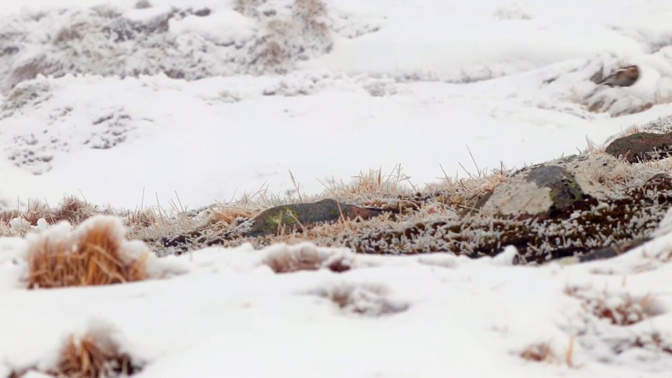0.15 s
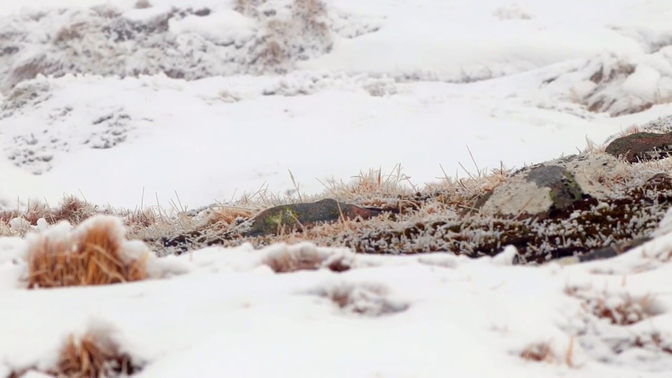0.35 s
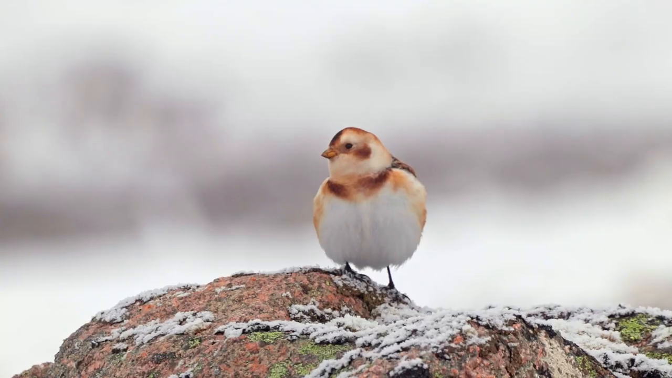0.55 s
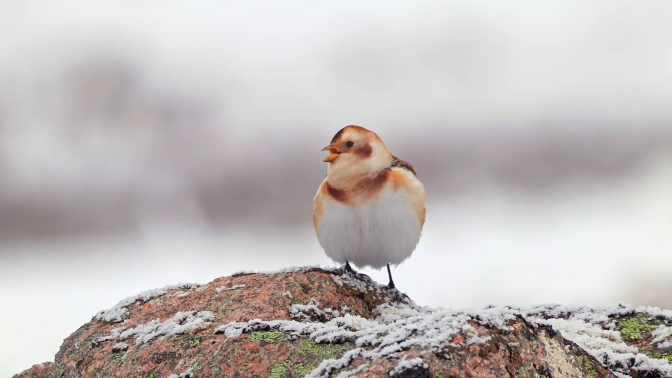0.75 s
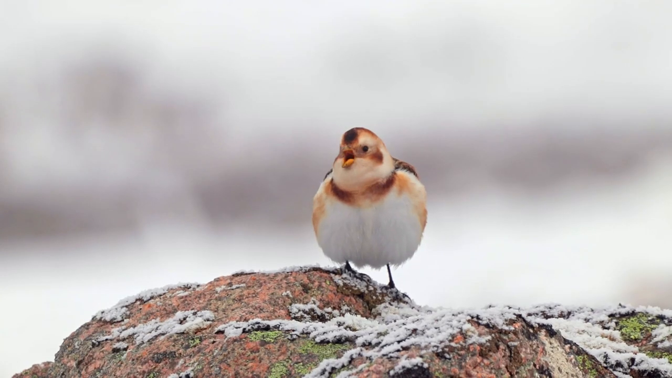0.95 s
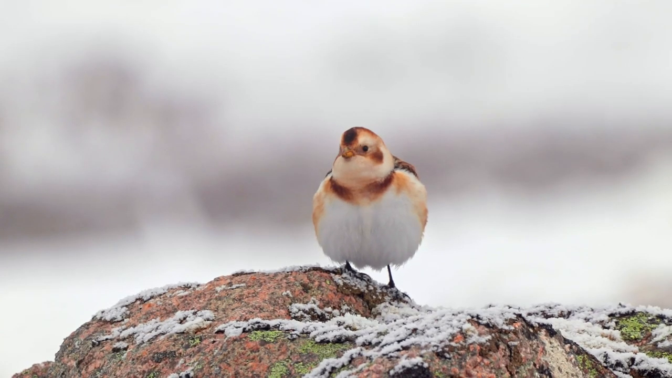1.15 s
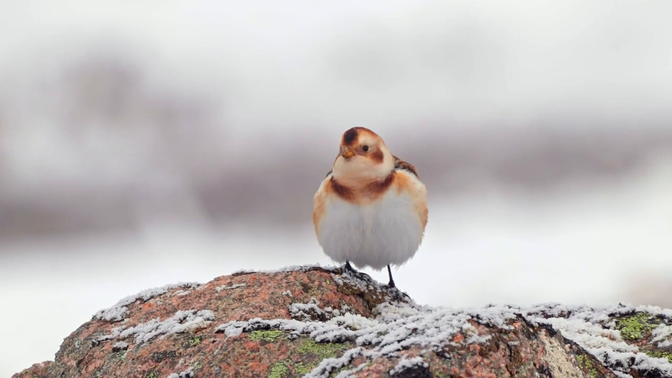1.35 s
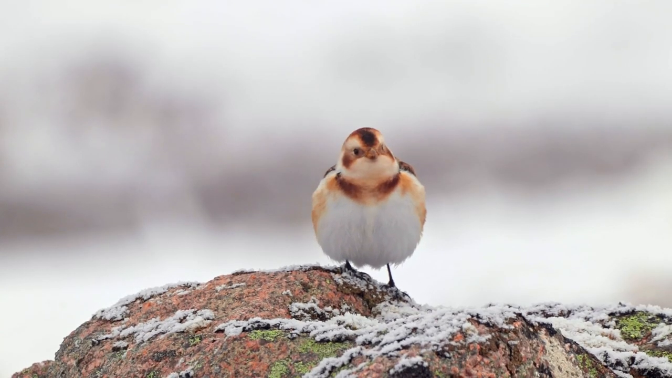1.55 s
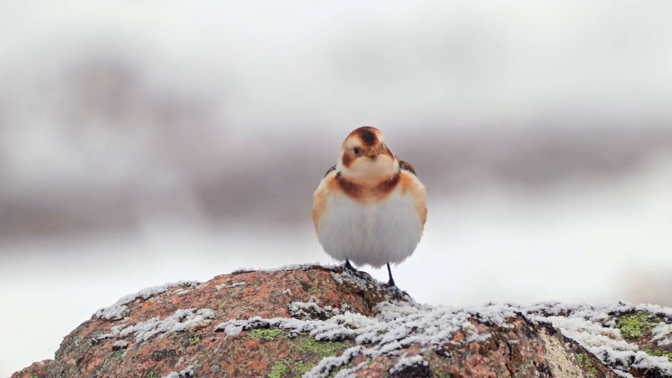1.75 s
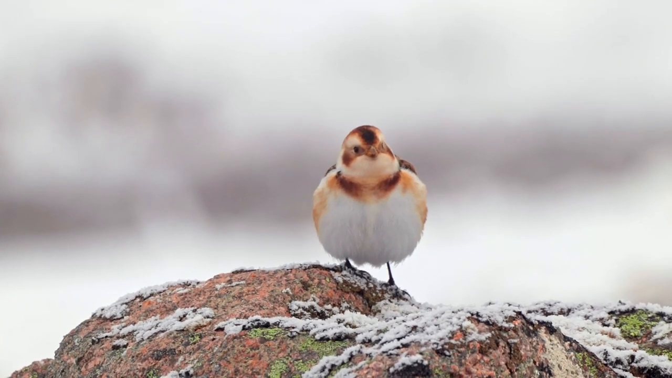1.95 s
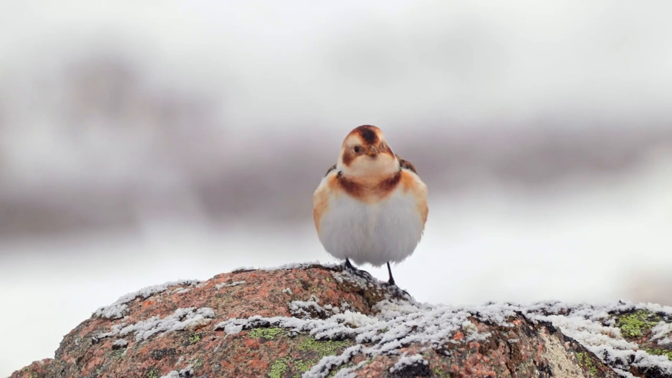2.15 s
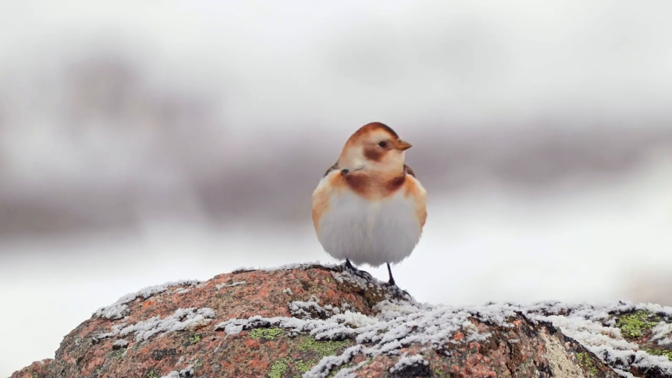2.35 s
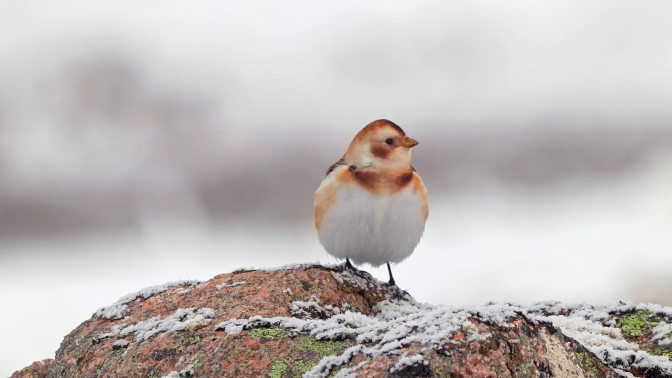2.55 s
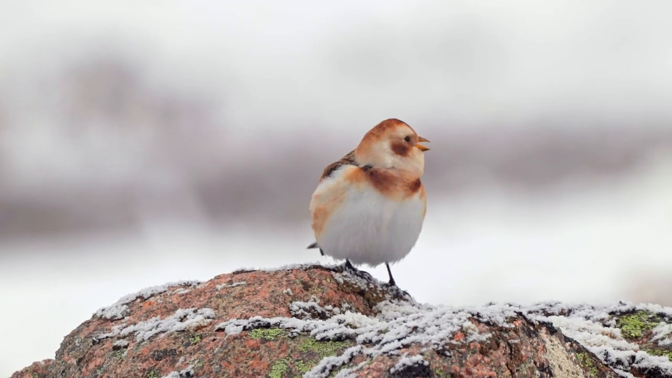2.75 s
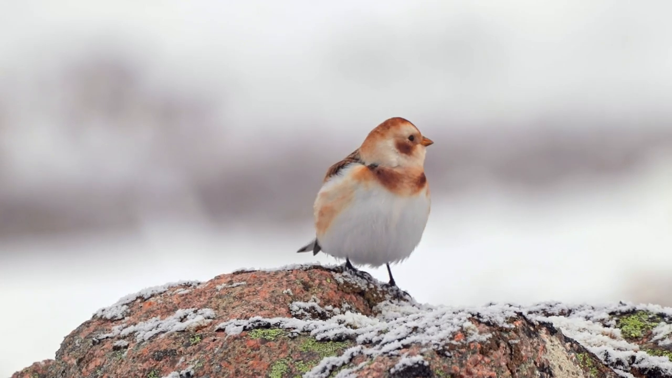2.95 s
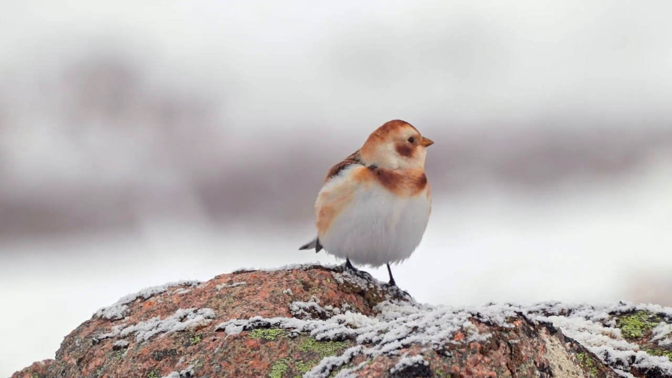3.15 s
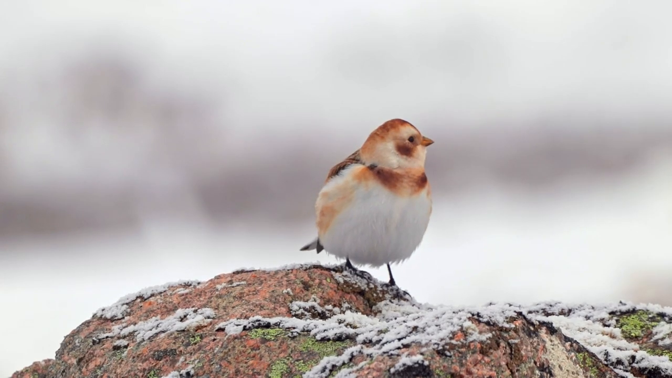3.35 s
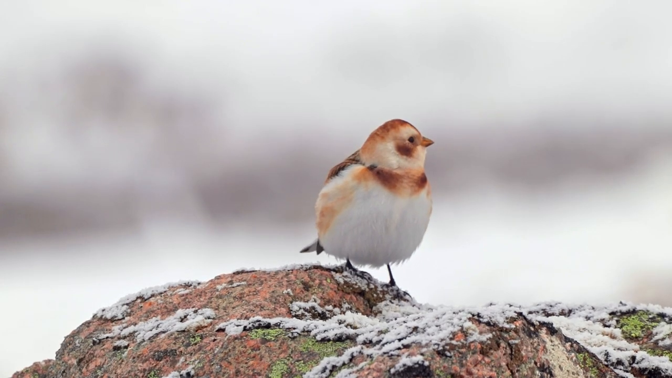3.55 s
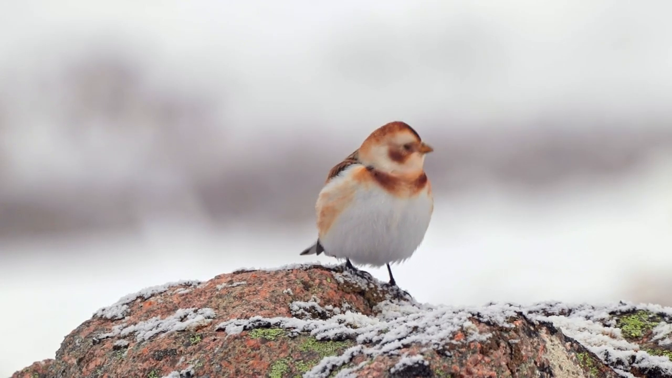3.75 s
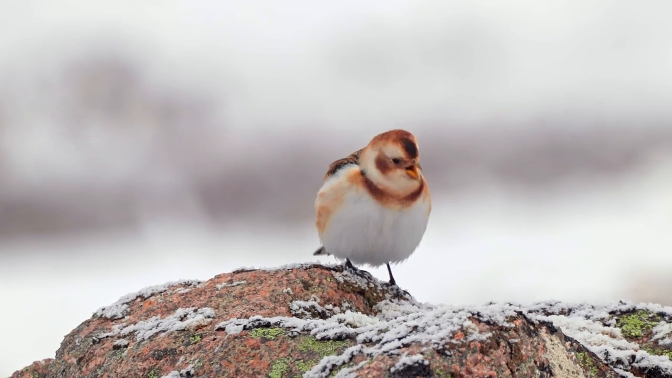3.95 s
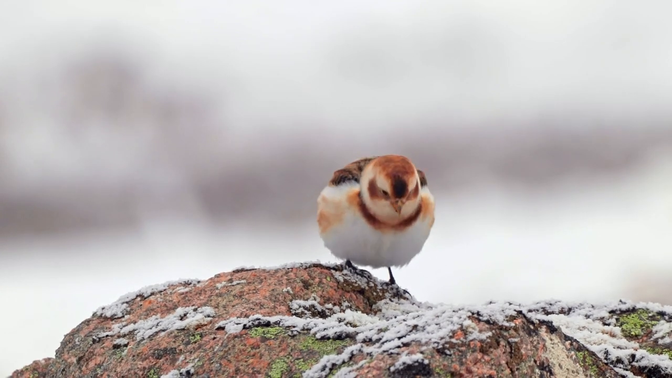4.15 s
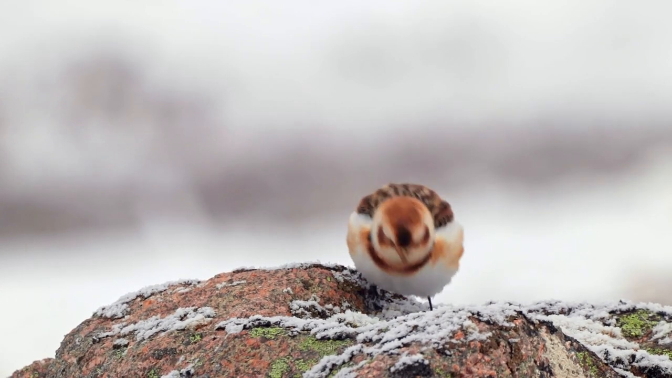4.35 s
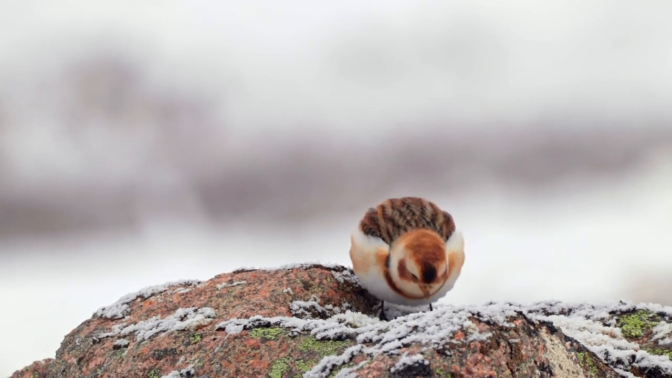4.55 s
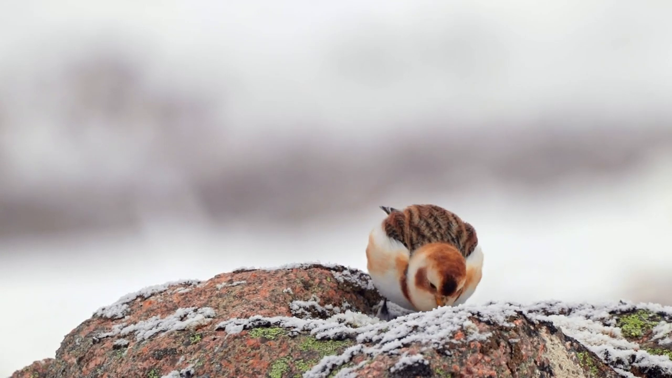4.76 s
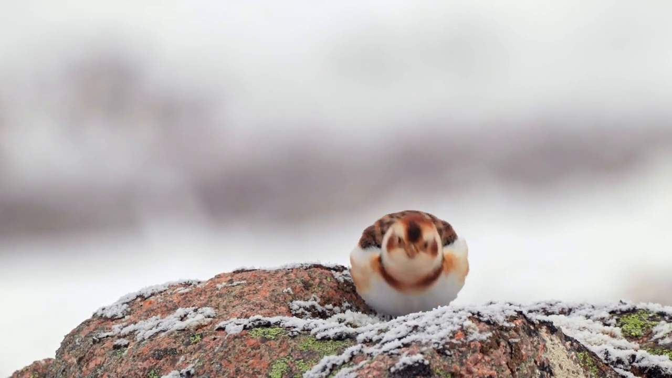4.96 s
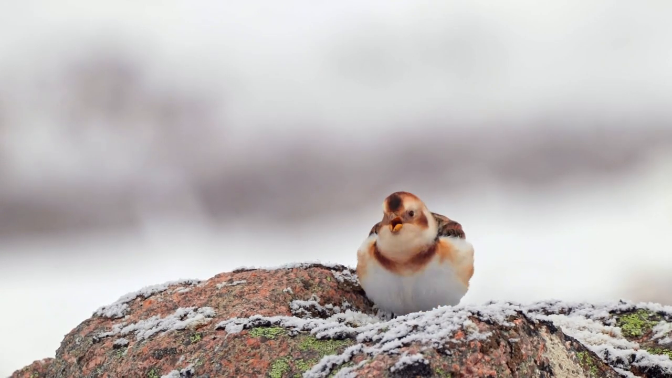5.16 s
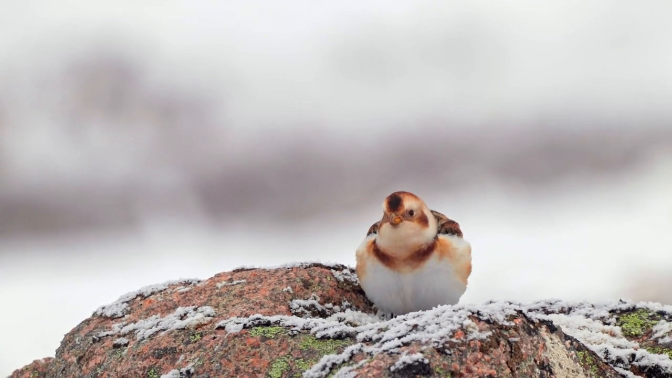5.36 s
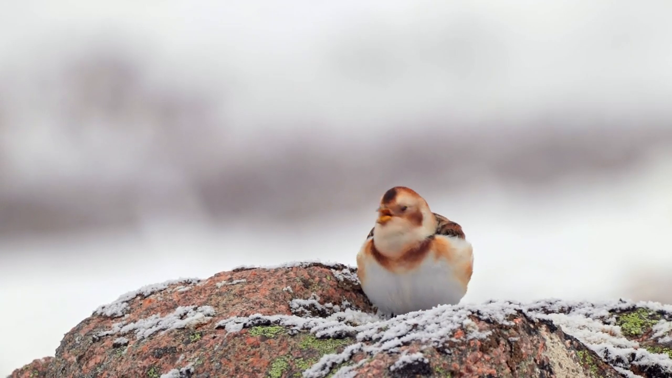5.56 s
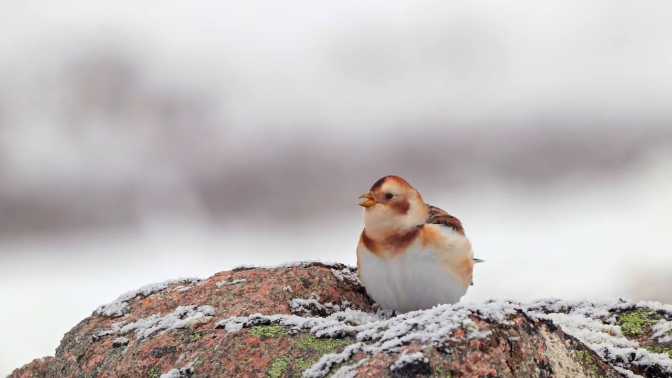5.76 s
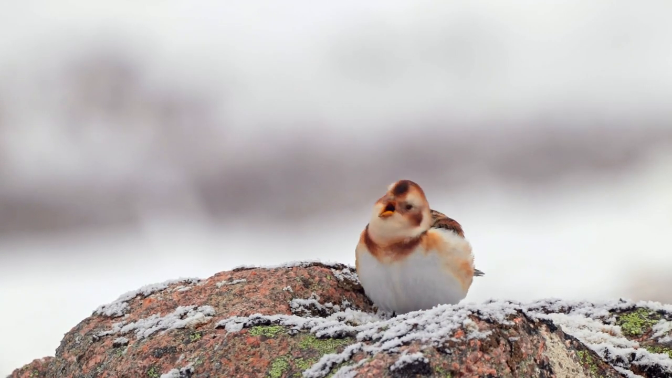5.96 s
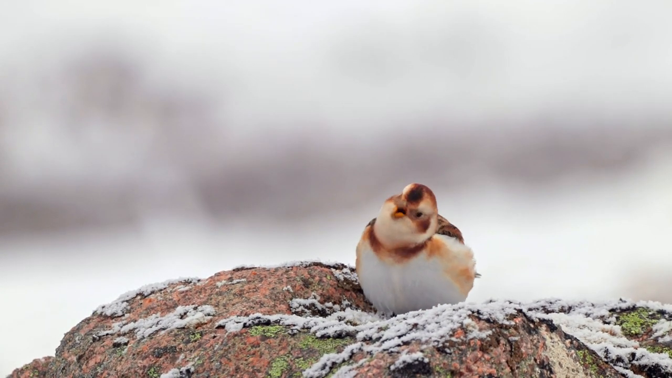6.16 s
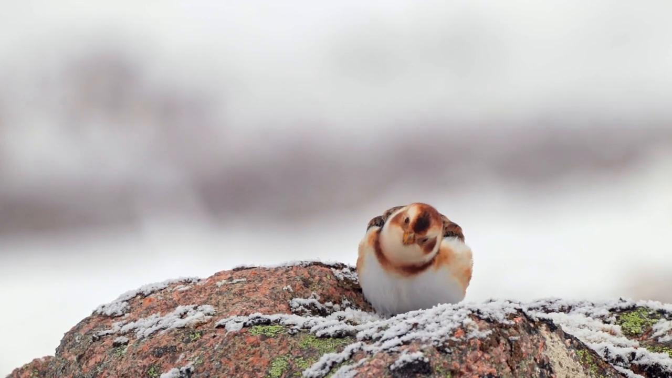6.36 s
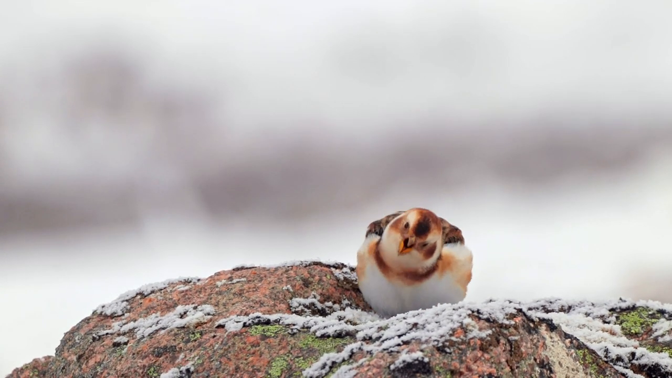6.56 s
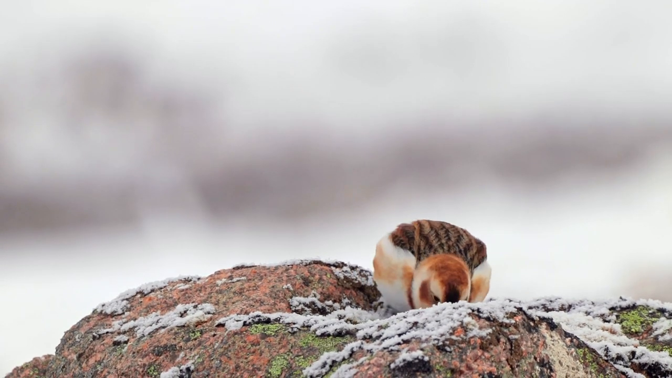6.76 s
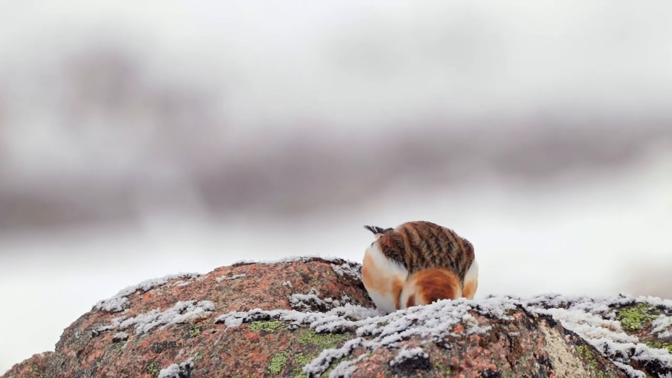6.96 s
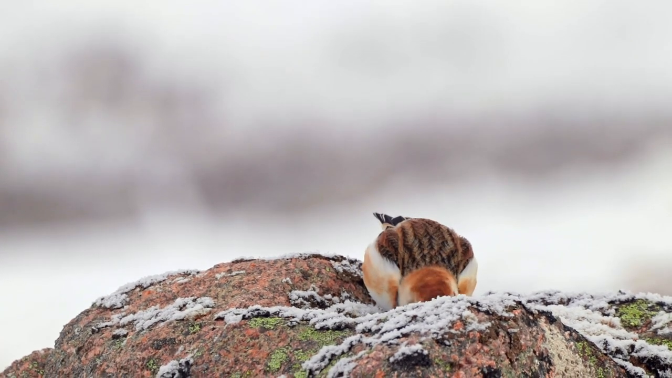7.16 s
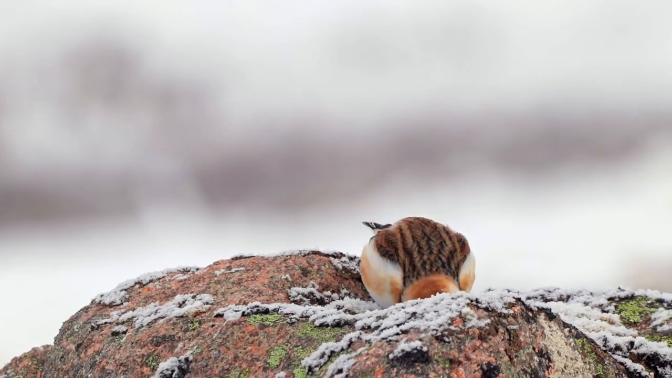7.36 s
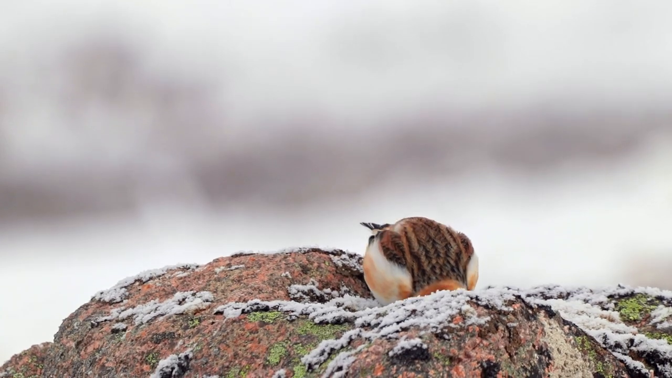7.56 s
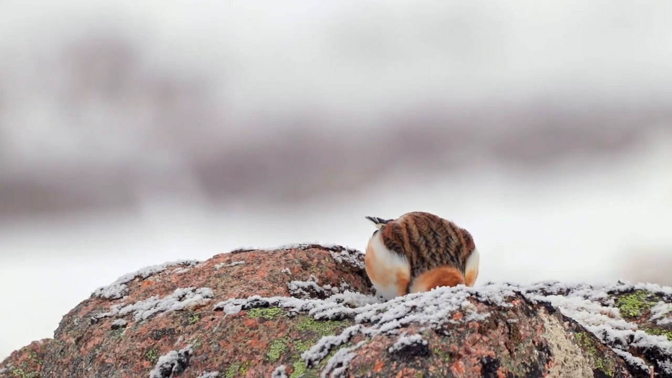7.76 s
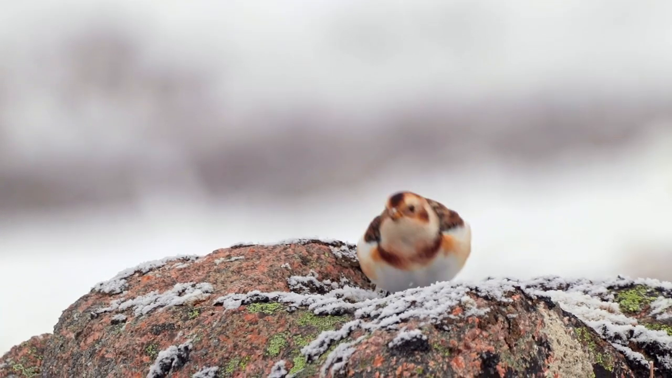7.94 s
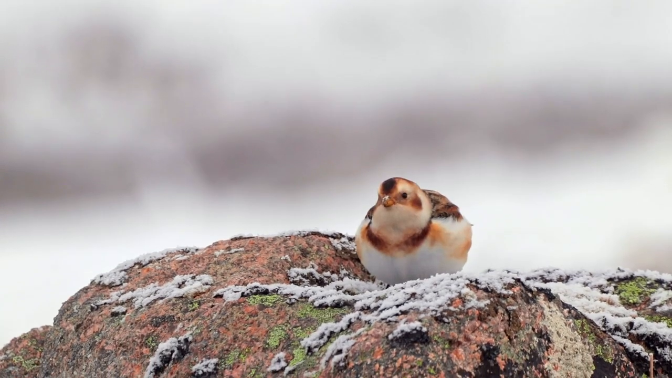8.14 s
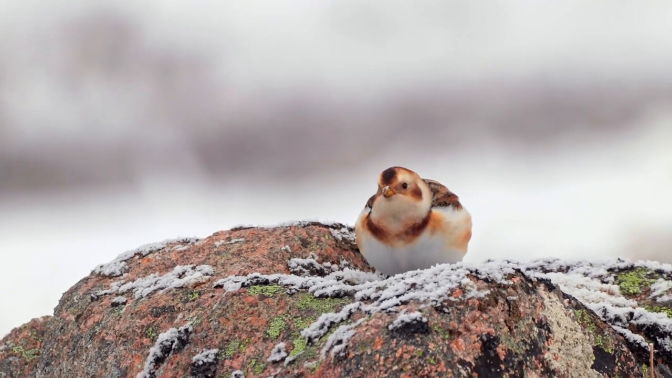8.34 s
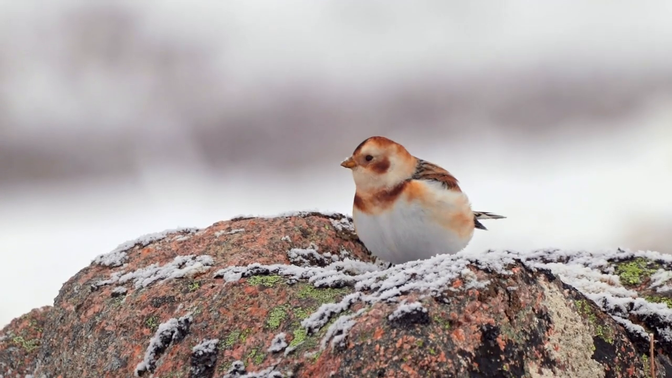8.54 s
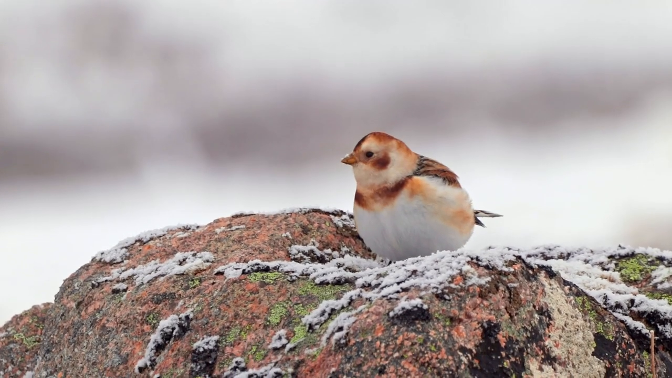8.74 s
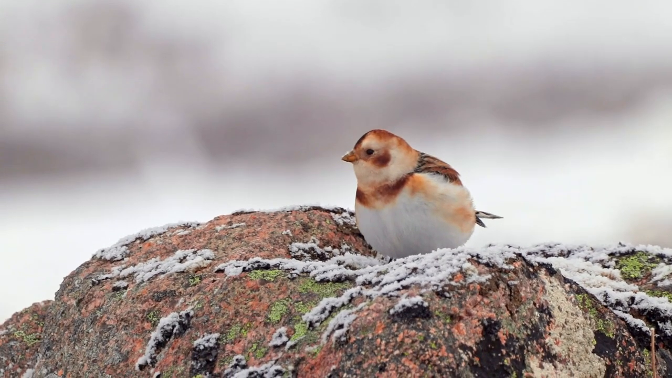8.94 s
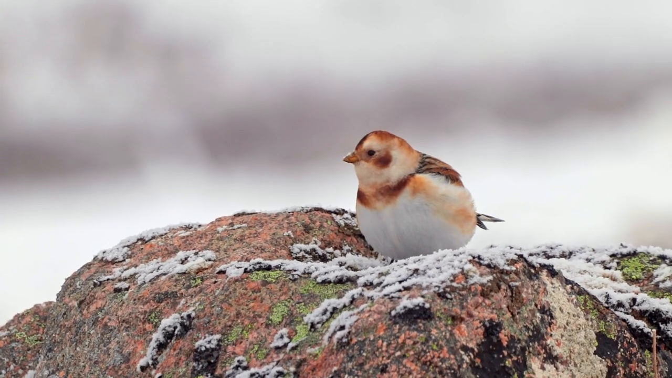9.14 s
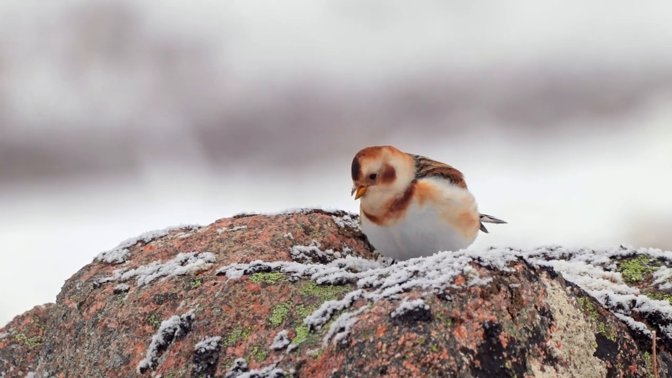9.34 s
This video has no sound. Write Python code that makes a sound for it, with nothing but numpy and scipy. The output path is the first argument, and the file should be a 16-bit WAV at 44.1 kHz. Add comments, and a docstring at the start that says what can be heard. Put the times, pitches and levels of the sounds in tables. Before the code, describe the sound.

A quiet stream gurgles under snow throughout, with tiny ringing bubbles, occasional rounder plops, a low murmur and a soft, even stereo hiss. At about 0.8 seconds a close, centred small bird gives a quarter-second burst: a buzzy trill and two high arched chirps that drop quickly. Around 2.8 seconds comes a softer cluster of short, lower chirps without a trill. At 3.9 a buzzing, descending trill leads into two bright chirps, ending by 4.25. From 4.85 to 7.05 it sings: faint quick notes and a tiny trill, then louder clear whistles sliding down near 5.6, rapid rippling notes around 6, a strong long fall at 6.2, chirps and a brief trill near 6.6, and a weak low closing note. Then just water until a very faint high tick at 9.4. Pure, slightly wavering, airy tones; open air, very weak echo.

```python
"""Open snowy slope: a small bird sings close by, over a stream that gurgles under the snow.
Three bursts of arched chirps, two with buzzy trills, lead into a song of clear gliding whistles.
Notes are wavering sines with faint overtones and airy rasp; trills swing fast across a pass band.
The stream is many ringing bubbles plus shaped noise. Weak echo; a soft, even stereo hiss lies under all."""
import sys
import numpy as np
from scipy import signal
from scipy.fft import rfft, irfft
from scipy.io import wavfile
from scipy.ndimage import uniform_filter1d

SR = 44100
rng = np.random.default_rng(int(sys.argv[2]) if len(sys.argv) > 2 else 0)


def digitize_waveform(pressure):
    """Quantize a signal to 16-bit integers and store it at the path in sys.argv[1].

    Rows of a 2-D input are taken as channels; values are limited to [-1, 1].
    """
    field = np.atleast_2d(pressure).T
    bounded = np.clip(field, -1, 1)
    quanta = np.round(bounded * 32767).astype(np.int16)
    wavfile.write(sys.argv[1], SR, quanta)


N = 414540


def bird():
    """All the notes, from one perch."""
    out = np.zeros(N)
    for note, table in (chirp, CHIRP_NOTES), (glide, GLIDE_NOTES), (trill, TRILL_NOTES):
        for row in table:
            add(out, *note(*row))
    for rows in [*SLUR_CURVES, LONG_FALL_CURVE, LOW_NOTE_CURVE]:
        add(out, *slur(rows))
    return out


# long slurred whistles, one curve each: t/s, f/Hz, level/dB
SLUR_CURVES = [
    [(4.935, 4800, -47), (4.951, 4713, -37.5), (4.983, 5410, -35.5), (4.997, 5020, -31), (5.007, 4180, -28),
     (5.015, 3930, -26.5), (5.029, 3708, -29), (5.047, 3240, -30.5), (5.057, 3224, -34), (5.066, 3340, -57)],
    [(5.269, 4500, -24), (5.285, 4170, -19.5), (5.311, 4100, -18), (5.347, 4130, -18.5),
     (5.373, 4240, -22.5), (5.383, 4330, -31), (5.39, 4250, -39.5)],
    [(5.986, 3550, -30), (5.998, 3960, -17), (6.008, 3850, -12), (6.06, 3926, -15), (6.08, 3737, -18),
     (6.088, 3920, -24), (6.1, 4216, -17), (6.108, 3960, -19), (6.124, 4140, -25.5), (6.13, 4074, -47)],
    [(6.681, 4730, -41), (6.687, 5460, -21.5), (6.693, 5030, -17.5), (6.713, 5180, -16.5),
     (6.719, 4940, -15.5), (6.731, 4310, -18), (6.759, 3560, -26), (6.773, 3290, -27.5),
     (6.785, 3270, -31.5), (6.794, 3244, -52)],
]
# a loud, long fall: t/s, f/Hz, level/dB
LONG_FALL_CURVE = [(6.213, 5900, -33), (6.221, 5070, -21), (6.233, 4350, -12.5), (6.249, 3820, -12.5),
                   (6.285, 3323, -14.5), (6.297, 3273, -14.5), (6.327, 2890, -21.5), (6.373, 2708, -24.5),
                   (6.401, 2690, -22), (6.443, 2468, -29), (6.455, 2440, -45.5)]
# low closing note of the song: t/s, f/Hz, level/dB
LOW_NOTE_CURVE = [(6.927, 1685, -46), (6.931, 1690, -38), (6.939, 2100, -38), (6.949, 1960, -38),
                  (6.957, 2250, -32.5), (7.011, 2080, -35), (7.033, 2060, -40), (7.044, 1904, -54)]
SLUR_EDGE_S = 0.00596  # attack and release


def slur(rows, third_db=-1):
    """A long whistle that follows its pitch and level smoothly."""
    t = np.arange(rows[0][0], rows[-1][0], 1 / SR)
    hz, db = uniform_filter1d(np.array(follow(rows, t)), size=80, axis=1)
    gain = gain_of(db) * envelope(t, SLUR_EDGE_S, SLUR_EDGE_S)
    return t[0], whistle(hz, gain, third_db)


# one-way glides: t/s, length/s, first f/Hz, last f/Hz, bend (+ moves early, - late),
# mid level/dB, swell/dB, attack/s
GLIDE_NOTES = [(.829, .007, 6030, 3520, 2, -43, 8, .002), (.948, 0.015, 4750, 2280, 2, -32, -7, 0.0048),
               (1.016, 0.019, 3700, 2820, -2.5, -43, 1, .002),
               (1.035, 0.016, 4300, 2560, 2, -44, -14, .003),
               (2.813, .017, 3300, 5240, -0.7, -44, -6, .005),
               (4.077, 0.012, 4150, 2500, 1.5, -36, -1, 0.0021),
               (4.989, 0.018, 6900, 5900, -1.5, -43, -12, .005),
               (5.262, .013, 1520, 4750, 1.5, -29.5, 23.5, 0.0024),
               (5.602, 0.11, 3944, 3126, 0.4, -15.5, 4, 0.043),
               (5.713, .1, 2983, 2570, -1.5, -18.5, -3.5, 0.016),
               (5.906, 0.02, 4670, 3740, -2.5, -20.5, 4.5, 0.0057),
               (5.926, .033, 4280, 5430, -0.4, -19, -0.5, 0.0084),
               (5.957, 0.0066, 5850, 3520, -0.2, -20, 0.5, 0.0024),
               (5.964, 0.024, 3186, 3690, -5, -20, -9.5, 0.0041),
               (6.108, 0.016, 5430, 5700, 1.5, -38.5, 0, .004),
               (6.187, 0.025, 4790, 4370, -3, -18.5, 12.5, .007),
               (6.211, 0.0059, 7200, 5610, 2.5, -35.5, 8.5, 0.0018),
               (6.583, 0.013, 3770, 3250, 3, -28, -3, 0.0021),
               (6.671, 0.014, 4740, 4300, -3, -31, -2, 0.0059),
               (6.859, 0.029, 3520, 4085, 0.5, -39, 22, 0.0046),
               (9.382, 0.02, 5000, 3300, 3, -46, -3.5, 0.003),
               (9.390, 0.0068, 6600, 6070, 5, -39.5, -2, 0.0023)]
GLIDE_RELEASE = 0.25  # share of length


def glide(start, length, first_hz, last_hz, bend, db, swell_db, attack_s, third_db=-1):
    """The pitch slides along an exponential from one note to another while the level swells or sags."""
    t = np.arange(0, length, 1 / SR)
    u = t / length
    hz = first_hz + (last_hz - first_hz) * np.expm1(-bend * u) / np.expm1(-bend)
    gain = gain_of(db + swell_db * (u - .5)) * envelope(t, attack_s, GLIDE_RELEASE * length)
    return start, whistle(hz, gain, third_db)


# arched chirps: t/s, length/s, first f/Hz, top f/Hz, last f/Hz, place of top (0-1),
# level/dB before beak and swell, undertone/dB at the top
CHIRP_NOTES = [(.833, 0.016, 3400, 4060, 3200, .5, -26.5, -35),
               (.956, 0.065, 4450, 5595, 2370, 0.28, -20.5, -2),
               (1.046, 0.063, 2930, 4514, 2530, 0.5, -21.5, -34),
               (2.772, .015, 2700, 3450, 3100, 0.58, -21.5, -20),
               (2.782, .014, 3070, 3430, 2500, .45, -24, -26),
               (2.824, .027, 2600, 3890, 2290, .54, -19, -34),
               (2.882, 0.041, 2490, 4180, 2450, 0.44, -24, -30),
               (2.957, .039, 2600, 4010, 2450, .51, -20.5, -35),
               (4.082, 0.064, 4420, 5790, 2610, 0.26, -25, -4),
               (4.186, 0.054, 3480, 5005, 2820, 0.4, -21.5, -29),
               (4.843, 0.026, 3180, 3620, 2680, 0.24, -37.5, -30),
               (4.871, 0.022, 2500, 3200, 2160, 0.33, -25, -19),
               (6.562, 0.025, 2890, 3570, 2940, 0.44, -17, -35),
               (6.593, 0.018, 2290, 3050, 2000, 0.54, -12.5, -29),
               (6.884, 0.03, 3310, 3620, 1810, 0.53, -18.5, -38)]
# beak pass band during a chirp: f/Hz, gain/dB
BEAK_BAND = [(2500, 6), (3100, -7.5), (3600, -4.5), (4000, -2), (4450, 4.5), (4750, -1), (5000, -2),
             (5300, -5), (5800, -10)]
RISE_POWER, FALL_POWER = 2.1, 2.71  # every arch is flat on top and steep at the ends
CHIRP_ATTACK_S, CHIRP_RELEASE_S, CHIRP_SWELL_DB = 0.007, 0.0084, 5
UNDERTONE_REACH_HZ = 190  # undertone is down 1 dB this far below the top, then dies fast


def chirp(start, length, first_hz, top_hz, last_hz, crest, db, undertone_db, third_db=-11):
    """The pitch arches through the beak's pass band; near the top, strong and weak cycles alternate."""
    t = np.arange(0, length, 1 / SR)
    u, crest = t / length, np.clip(crest, .05, .95)
    rise = np.maximum(1 - u / crest, 0)
    fall = np.maximum((u - crest) / (1 - crest), 0)
    hz = top_hz - (top_hz - first_hz) * rise ** RISE_POWER - (top_hz - last_hz) * fall ** FALL_POWER
    beak_db = read(BEAK_BAND, hz)
    gain = gain_of(db + beak_db + CHIRP_SWELL_DB * (u - 1.0))
    gain *= envelope(t, CHIRP_ATTACK_S, CHIRP_RELEASE_S)
    loss_db = ((top_hz - hz) / UNDERTONE_REACH_HZ) ** 2
    # the undertone takes the beak's gain at the top pitch throughout
    undertone = gain_of(undertone_db - loss_db + read(BEAK_BAND, top_hz) - beak_db)
    return start, whistle(hz, gain, third_db, undertone)


# trills, each starting at the top of a sweep: t/s, length/s, sweep rate/Hz,
# first centre f/Hz, last centre f/Hz, swing (log pitch), crest level/dB before throat
TRILL_NOTES = [(0.8382, 0.1, 96, 4210, 3230, .35, -18), (3.934, 0.11, 99.4, 4510, 2290, 0.37, -18.5),
               (4.892, 0.041, 101, 3710, 3040, 0.11, -29.5), (6.6133, .034, 95.3, 3240, 3840, 0.13, -18.5)]
# pass band of throat and open beak during a trill: f/Hz, gain/dB
THROAT_BAND = [(2000, -24), (2600, -14), (3100, -4), (3500, -1), (4300, 0), (4700, -4), (5150, -14),
               (6000, -21), (7500, -31), (10000, -24), (14000, -40)]
TRILL_RISE_DB, TRILL_CREST, TRILL_FADE_DB = 15, 0.31, 11  # swells up to a share of its length, then fades
TRILL_SLANT, TRILL_SAG = 0.25, .08  # sweeps climb faster than they fall; log-pitch sag at the pinch
PINCH, PINCH_AT, PINCH_WIDTH = 0.46, 0.354, 0.07  # swing narrows near the crest (shares of swing, length)


def trill(start, length, sweep_hz, first_hz, last_hz, swing, db, uneven=0.1, second_db=-12, rasp_db=-27):
    """Fast pitch swings across the throat band chop the note into pulses and lift the octave at troughs."""
    t = np.arange(0, length, 1 / SR)
    u, turn = t / length, 2 * np.pi * sweep_hz * t
    slanted = turn + TRILL_SLANT * (np.cos(turn) - 1)
    zigzag = uniform_filter1d(np.arcsin(np.cos(slanted)) * 2 / np.pi, size=40)
    pinch = np.exp(-((u - PINCH_AT) / PINCH_WIDTH) ** 2)
    width = swing * (1 - PINCH * pinch) * (1 + uneven * wander(len(t), size=400))
    centre_hz = first_hz + (last_hz - first_hz) * u
    hz = centre_hz * np.exp(width * zigzag - TRILL_SAG * pinch)
    phase = 2 * np.pi * np.cumsum(hz * (1 + .012 * wander(len(t), size=30))) / SR
    tone = gain_of(read(THROAT_BAND, hz)) * np.sin(phase)
    tone += gain_of(second_db + read(THROAT_BAND, 2 * hz)) * np.sin(2 * phase)
    tone *= gain_of(1.3 * wander(len(t), size=45))  # 1.3 dB rms flutter
    rise = np.maximum(1 - u / TRILL_CREST, 0)
    fade = np.maximum((u - TRILL_CREST) / (1 - TRILL_CREST), 0)
    gain = gain_of(db - TRILL_RISE_DB * rise - TRILL_FADE_DB * fade ** 2)
    tone += gain_of(rasp_db) * rasp(hz, leap_hz_per_ms=387)
    return start, faded(np.sqrt(2) * gain * tone)


# octave vs fundamental: landing f/Hz, level/dB
SECOND_PARTIAL = [(4000, -34.5), (5000, -35.5), (6500, -44.5), (7800, -56.5), (9000, -33.5), (10500, -33),
                  (12000, -19.5), (16000, -46)]
# third partial vs fundamental, before third_db: landing f/Hz, level/dB
THIRD_PARTIAL = [(6000, -34.5), (8500, -47.5), (10000, -39), (11700, -35), (13000, -57.5), (15500, -29.5)]
# partial at 1.5 times the pitch vs undertone: landing f/Hz, level/dB
UPPER_HALF_PARTIAL = [(4500, -1), (5500, -2), (6800, -7), (8000, -20)]


def whistle(hz, gain, third_db, undertone=0, shimmer=0.027, rasp_db=-23):
    """A nearly pure, slightly wavering tone with faint overtones, at times with a doubled period."""
    waver = .0045 * wander(len(hz), size=260) + .0012 * wander(len(hz), size=60)  # rms shares of pitch
    phase = 2 * np.pi * np.cumsum(hz * (1 + waver)) / SR
    tone = np.sin(phase) + gain_of(read(SECOND_PARTIAL, 2 * hz)) * np.sin(2 * phase)
    tone += gain_of(third_db + read(THIRD_PARTIAL, 3 * hz)) * np.sin(3 * phase)
    halves = np.sin(phase / 2)
    halves += gain_of(read(UPPER_HALF_PARTIAL, 1.5 * hz)) * np.sin(1.5 * phase)
    tone += undertone * halves + gain_of(rasp_db) * rasp(hz, leap_hz_per_ms=291.3)
    shimmering = 1 + shimmer * wander(len(hz), size=110)
    return faded(np.sqrt(2) * tone * gain * shimmering, size=30)


# colour of the air rasp: f/Hz, relative level/dB per Hz
RASP_COLOUR = [(1000, -27), (2200, -3.5), (3500, 5.5), (5000, 4), (7000, -23.5), (10000, -9),
               (13000, -19.5), (16000, -24)]


def rasp(hz, leap_hz_per_ms):
    """Airy noise that grows with the speed of the pitch change."""
    leap = uniform_filter1d(abs(np.gradient(hz)), size=60) * SR / 1000  # Hz per ms
    colour = gain_of(read(RASP_COLOUR, np.fft.rfftfreq(len(hz), 1 / SR)))
    air = irfft(rfft(rng.standard_normal(len(hz))) * colour, len(hz))
    return evened(air) * np.tanh(leap / leap_hz_per_ms)


def slope(x, near_db=-33, near_t60_s=.07, far_db=-43, far_t60_s=0.65):
    """Nearby rocks scatter a little sound at once; the snowy slope adds a weaker, longer tail."""
    t = np.arange(SR // 2) / SR
    t60_s = np.array([[near_t60_s], [far_t60_s]])
    near, far = rng.standard_normal((2, len(t))) * gain_of(-60 * t / t60_s)
    response = gain_of(near_db) * near / np.linalg.norm(near)
    response += gain_of(far_db) * far / np.linalg.norm(far)
    return signal.fftconvolve(x, response)[:N]


# bubbles that stand out: t/s, level/dB before plop_db, f/Hz
BIG_BUBBLES = [(0.148, -31.5, 1520), (0.487, -41.5, 485), (1.661, -38.5, 1070), (0.91, -36, 924),
               (1.216, -39, 887), (2.347, -38, 916), (2.611, -37, 1090), (2.76, -38.5, 930),
               (3.83, -31, 980), (4.013, -38.5, 455), (4.085, -37.5, 904), (4.379, -33, 1390),
               (5.413, -30, 812), (6.23, -37, 940), (6.587, -33.5, 920), (6.926, -39, 1700),
               (7.078, -35, 1050), (7.361, -37.5, 786), (8.424, -38, 840), (8.928, -33.5, 930)]


def plops(cycles=6, plop_db=-1):
    """Larger bubbles that stand out of the gurgle."""
    out = np.zeros(N)
    for s, db, hz in BIG_BUBBLES:
        add(out, s, gain_of(db + plop_db) * bubble(hz, cycles))
    return out


def bubble(hz, cycles, rise=0.033):
    """A trapped bubble rings for some cycles, its pitch rising as it nears the surface."""
    age = np.arange(0, 6, hz / (cycles * SR))  # in decay times
    decay = np.exp(-age) * (1 - np.exp(-2 * age * cycles))
    return decay * np.sin(2 * np.pi * cycles * age * (1 + rise * age))


# colour of the water: f/Hz, relative level/dB per Hz
WATER_COLOUR = [(40, -31.5), (110, -29), (170, -12), (260, -6), (370, -9), (460, -4.5), (750, -5.5),
                (950, -4.5), (1400, -8.5), (2200, -10.5), (3200, -12.5), (4500, -22), (7000, -26),
                (15000, -31)]
# uneven level of the stream, with brief swells; used about its mean, scaled by uneven_share: t/s, level/dB
STREAM_LEVEL = [(0.0, -52.5), (0.02, -52.5), (1.73, -55), (1.78, -49), (1.96, -56.5), (2.17, -52.5),
                (2.59, -59.5), (2.62, -45.5), (2.88, -54), (5.21, -52), (5.37, -52), (5.42, -51),
                (5.47, -53.5), (8.54, -55.5), (8.77, -54.5), (8.93, -50.5), (9.06, -56.5), (9.4, -57.5)]


def stream(per_s=1500, spread_db=4.0, cycles=4.86, wash_db=-6, water_db=-52.0, splash_db=1.07,
           surge_db=0.52, uneven_share=0.38, count=90):
    """Countless small bubbles and a soft wash, bunched by little splashes, at an uneven level."""
    grains = np.zeros(N)
    for hz in np.geomspace(130, 7000, count):
        rate_hz = per_s / count * (hz / 1000)  # small, high bubbles are the most common
        hits = np.flatnonzero(rng.random(N) < rate_hz / SR)
        # low gulps die within a few cycles
        ring = bubble(hz, cycles * min(hz / 600, 1) * rng.uniform(0.59, 1.51))
        ring /= np.linalg.norm(ring)
        sizes = np.minimum(rng.exponential(1, len(hits)), 4)
        for at, size in zip(hits, sizes):
            add(grains, at / SR, gain_of(spread_db * size) * ring)
    wash = coloured(rng.standard_normal(N), WATER_COLOUR)
    water = coloured(grains, WATER_COLOUR) + gain_of(wash_db) * wash
    bunching_db = splash_db * wander(N, size=450) + surge_db * wander(N, size=2600)
    water = evened(water * gain_of(bunching_db))
    level_db = follow(STREAM_LEVEL, np.arange(N) / SR)[0]
    return water * gain_of(water_db + uneven_share * (level_db - level_db.mean()))


# colour of the low murmur: f/Hz, relative level/dB per Hz
RUMBLE_COLOUR = [(15, 6), (60, -1), (150, -1), (300, -9), (1000, -29), (4000, -64)]


def rumble(rumble_db=-68):
    """The steady low murmur of the water under the snow, as shaped noise."""
    return gain_of(rumble_db) * coloured(rng.standard_normal(N), RUMBLE_COLOUR)


# colour of the steady hiss: f/Hz, relative level/dB per Hz
HISS_COLOUR = [(20, 3), (400, 3), (900, 0), (2000, -1), (5000, 1), (10500, 1), (13500, -1), (16000, -2)]


def hiss(hiss_db=-60):
    """Even shaped noise, unrelated on the two sides."""
    return gain_of(hiss_db) * coloured(rng.standard_normal((2, N)), HISS_COLOUR)


def gain_of(db):
    """Decibels to amplitude."""
    return 10 ** (np.asarray(db) / 20)


def evened(x):
    """Scales to rms 1."""
    return x / np.sqrt(np.mean(x ** 2) + 1e-20)


def read(points, hz):
    """Reads a spectrum on a log-frequency axis."""
    f, value = np.transpose(points)
    return np.interp(np.log(hz + 1), np.log(f + 1), value)


def follow(rows, t):
    """Every column of a curve at the times t."""
    s, *columns = np.transpose(rows)
    return [np.interp(t, s, c) for c in columns]


def add(mix, s, sound):
    """Adds a sound into the mix at time s."""
    part = mix[max(round(s * SR), 0):][:len(sound)]
    part += sound[:len(part)]


def coloured(x, points):
    """Filters by a spectrum; rms 1."""
    return evened(irfft(rfft(x) * gain_of(read(points, np.fft.rfftfreq(N, 1 / SR))), N))


def wander(length, size):
    """Smooth chance of rms 1 that changes over size samples."""
    return evened(uniform_filter1d(uniform_filter1d(rng.standard_normal(length), size), size))


def faded(x, size=50):
    """Softens both ends over size samples."""
    i = np.arange(len(x))
    return x * np.clip(np.minimum(i, i[::-1]) / size, 0, 1)


def envelope(t, attack_s, release_s):
    """Rise, hold and release over the times t."""
    ramp = np.minimum((t - t[0]) / attack_s, (t[-1] - t) / release_s)
    return np.sin(np.pi / 2 * np.clip(ramp, 0, 1)) ** 2


def scene():
    """Bird and stream straight ahead, in a wide hiss."""
    song = bird()
    return song + slope(song) + plops() + stream() + rumble() + hiss()


EDGE_HZ = 15850


def record(dry):
    """Band limit: a steep linear-phase low-pass at EDGE_HZ."""
    lowpass = signal.firwin(511, EDGE_HZ, window=("kaiser", 9), fs=SR)
    return signal.oaconvolve(dry, lowpass[None], "same")


dry = scene()
out = record(dry)
digitize_waveform(out)
```